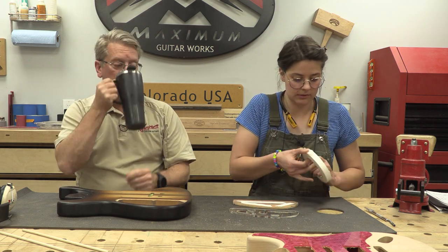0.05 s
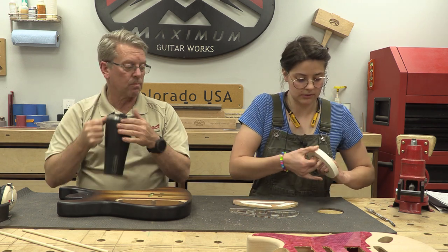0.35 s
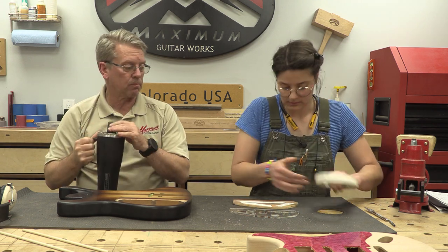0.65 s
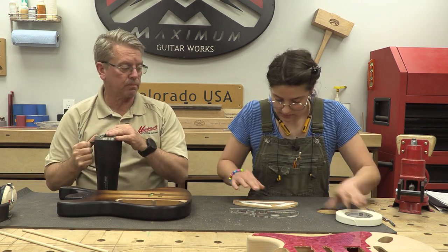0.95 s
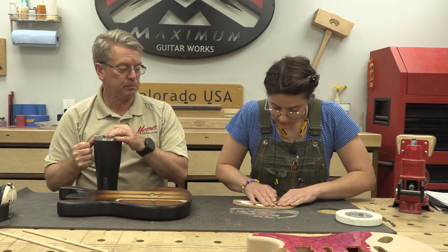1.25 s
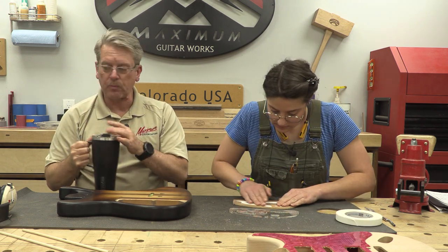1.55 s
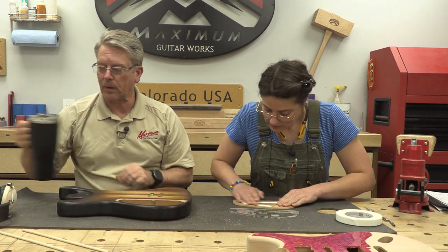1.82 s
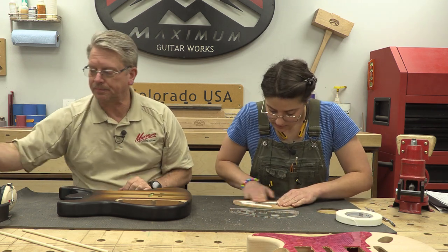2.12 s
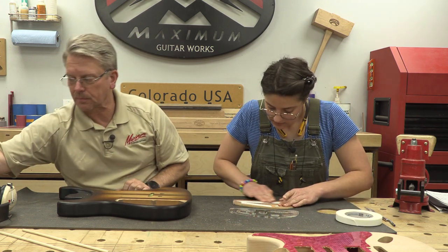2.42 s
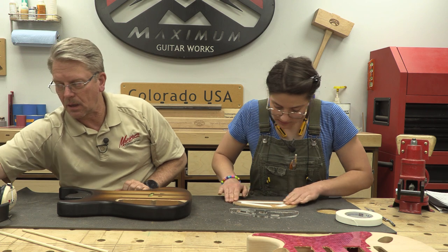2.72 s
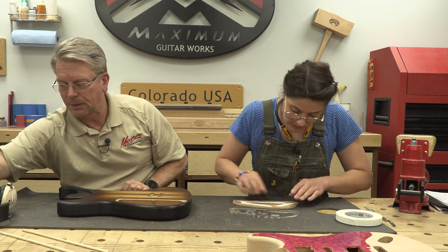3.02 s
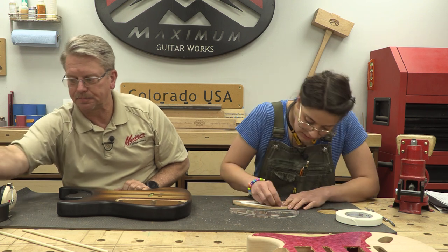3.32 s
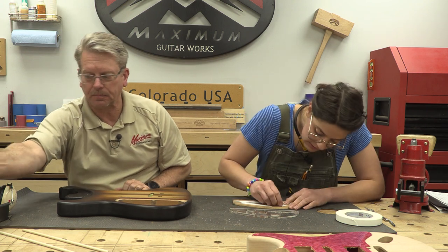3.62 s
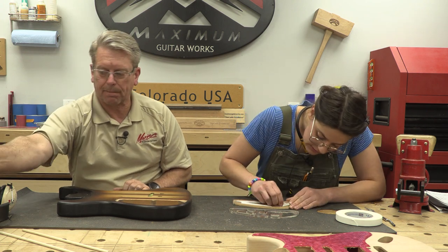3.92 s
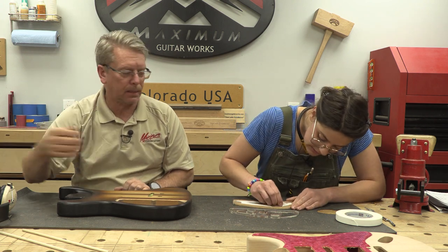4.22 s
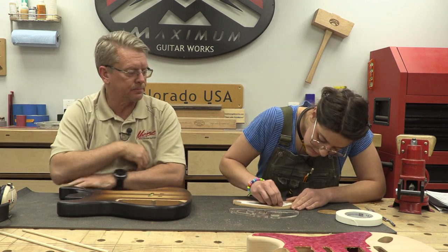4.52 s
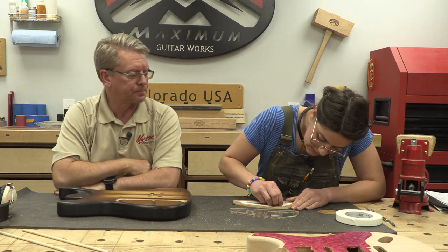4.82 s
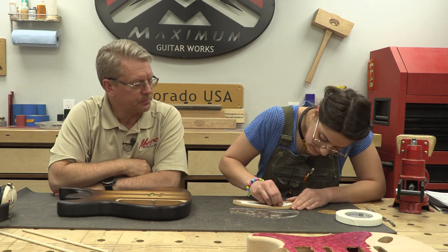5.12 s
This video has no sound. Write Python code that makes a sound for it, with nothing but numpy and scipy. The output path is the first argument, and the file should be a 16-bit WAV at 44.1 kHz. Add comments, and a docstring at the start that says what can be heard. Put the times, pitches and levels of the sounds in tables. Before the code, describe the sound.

Masking tape rustles lightly, then the roll drops on a wooden workbench with a bouncing thud. The tape gives a few sharp snaps, and fingers rub it along a thin template in several hissing, papery strokes. A mug is set down with a dull knock, followed by two small clacks, faint fingernail picking and a soft scuff. The sounds are fairly close, in a small, quiet workshop.

```python
"""Masking tape rustles, snaps and rasps at a wooden workbench in a small workshop.
The roll drops and bounces, ringing the bench top. Fingers rub the tape along a thin template in six
strokes, the last one light: tiny stick-slip releases hiss, rasp and set the template ringing.
A fingernail picks at the edge, a mug is set down with a dull knock, then come two small clacks and a
scuff, all in a short room decay over quiet air."""
import sys
import numpy as np
from scipy import signal
from scipy.fft import rfft, irfft, next_fast_len
from scipy.io import wavfile

SR = 44100
rng = np.random.default_rng(int(sys.argv[2]) if len(sys.argv) > 2 else 0)


def file_out(sig):
    """Save sig as 16-bit WAV at sys.argv[1]."""
    # one column per channel
    cols = np.atleast_2d(sig).T
    # limit, then scale
    lim = np.clip(cols, -1, 1)
    pcm = np.round(lim * 32767).astype(np.int16)
    wavfile.write(sys.argv[1], SR, pcm)


N = 227467
TIME = np.arange(N) / SR
SHORT = TIME[:SR * 7 // 10]   # time axis of one hit or room tail

# papery rasp of rubbed tape: (frequency [Hz], level [dB])
RASP_SPECTRUM = [(1500, -33), (2200, 1.5), (2800, 5.5), (3900, 5.5), (4700, 4.5), (5500, 0.5), (7000, -14)]
# airy sound of brushed paper: (frequency [Hz], level [dB])
BRUSH_SPECTRUM = [(400, -13.5), (1500, -13.5), (2400, -11.5), (3200, -10.5), (5000, -17.5), (6500, -10),
                  (8300, -2), (10000, 0), (12000, -3), (13000, -16), (15800, -28.5)]


def amp(db):
    """Decibels to gain."""
    return 10 ** (np.asarray(db) / 20)


def rms_one(x):
    """Scale to unit rms."""
    return x / np.sqrt(np.mean(x ** 2) + 1e-20)


def peak_one(x):
    """Scale to unit peak."""
    return x / np.abs(x).max()


def at_hz(points, hz):
    """Read a table on a log-frequency axis."""
    freqs, values = np.transpose(points)
    return np.interp(np.log(np.maximum(hz, 1)), np.log(freqs), values)


def colour(x, spectrum):
    """Give a noise a spectrum; rms 1."""
    size = next_fast_len(len(x))
    gains = amp(at_hz(spectrum, np.fft.rfftfreq(size, 1 / SR)))
    return rms_one(irfft(rfft(x, size) * gains, size)[:len(x)])


def hit_noise(spectrum):
    """Coloured noise for one hit; rms 1."""
    return colour(rng.standard_normal(len(SHORT)), spectrum)


def cut(x, hz, kind, order=2):
    """Butterworth filter."""
    sos = signal.butter(order, np.clip(hz, 10, .45 * SR), kind, fs=SR, output="sos")
    return signal.sosfilt(sos, x)


def flutter(rate_hz):
    """Smooth random modulation; rms 1."""
    return rms_one(cut(rng.standard_normal(N), rate_hz, "low"))


def dying(t60):
    """Envelope that loses 60 dB in t60 seconds."""
    return np.exp(-np.log(1000) * SHORT / max(t60, 1e-3))


def add(track, start_s, sound):
    """Mix a sound into the track."""
    start = max(int(start_s * SR), 0)
    track[start:start + len(sound)] += sound[:N - start]


def strike(modes, contact_hz, lowest_hz):
    """Modes rung by one contact, duller the softer it is; a small body radiates little bass. Peak 1."""
    ring = sum(amp(db) * dying(t60) * np.sin(2 * np.pi * hz * SHORT) for hz, db, t60 in modes)
    ring = cut(cut(ring, contact_hz, "low", order=1), 4 * contact_hz, "low")
    return peak_one(cut(ring, lowest_hz, "high"))


def slips(per_s, spread_db):
    """Tiny stick-slip releases of uneven size on the creped paper."""
    sizes = amp(spread_db * np.minimum(rng.exponential(1, N), 5)) * rng.choice([-1, 1], N)
    return rms_one(sizes * (rng.random(N) < per_s / SR))


def swell(start, rise, hold, fall, sag_db_per_s=0):
    """Pressure of one movement of the hand: a rounded rise, a hold that may sag, a rounded fall."""
    edge_db = 38.5   # depth of the rise and the fall
    top = start + rise
    early = np.maximum(top - TIME, 0) / max(rise, 1e-3)
    late = np.maximum(TIME - top - hold, 0) / max(fall, 1e-3)
    sag_db = sag_db_per_s * np.clip(TIME - top, 0, hold + fall)
    return amp(np.maximum(-edge_db * (early ** 2 + late ** 2) - sag_db, -300))


def moving_resonance(x, centre_hz, width_hz, block=128):
    """A resonance whose centre glides; rms 1."""
    radius = np.exp(-np.pi * width_hz / SR)
    out, state = np.zeros(N), np.zeros(2)
    for i in range(0, N, block):
        poles = [1, -2 * radius * np.cos(2 * np.pi * centre_hz[i] / SR), radius * radius]
        out[i:i + block], state = signal.lfilter([1, 0, -1], poles, x[i:i + block], zi=state)
    return rms_one(out)


def brushing():
    """Skin slides lightly on the roll and the tape, part airy, part papery."""
    # hand movements: (start [s], rise [s], hold [s], fall [s], airy level [dB], papery level [dB])
    slides = [(-.03, 0.035, 0.023, 0.12, -55, -63), (.05, 0.022, 0.026, 0.081, -47.5, -76),
              (0.127, 0.043, 0.13, 0.18, -81, -69), (0.3, .008, 0.0026, 0.027, -64, -86),
              (0.328, 0.082, 0.0055, 0.12, -55.5, -62), (0.475, 0.063, 0.014, 0.12, -71.5, -66.5),
              (0.617, 0.047, 0.015, 0.05, -68, -64), (0.707, 0.041, 0.069, .07, -75, -74),
              (0.858, .031, .002, 0.024, -61, -76), (1.118, 0.029, 0.022, 0.087, -52, -52),
              (1.203, .06, 0.054, 0.051, -72.5, -58), (2.63, .04, .025, .05, -59, -52),
              (3.198, 0.024, .012, 0.076, -68.5, -60.5), (4.482, 0.15, 0.038, 0.094, -75.5, -73)]
    airy = papery = 0
    for *timing, airy_db, papery_db in slides:
        pressure = swell(*timing)
        airy += amp(airy_db) * pressure
        papery += amp(papery_db) * pressure
    rustle = airy * colour(slips(12000, 1.5), BRUSH_SPECTRUM)
    rustle += amp(-3.5) * papery * colour(slips(6100, 1.1), RASP_SPECTRUM)
    return rustle * amp(0.75 * flutter(rate_hz=140) - 1.0)


def tape_snaps():
    """Tape and template let go with a gritty crack; the pitch depends on where the fingers hold them."""
    # releases: (time [s], level [dB], contact cut-off [Hz], pitch [ratio])
    releases = [(0.051, -28.5, 9300, 1.19), (0.279, -47.5, 3460, 0.93), (1.1291, -35.5, 2350, 0.64),
                (1.1575, -34, 2404, 0.78), (1.1984, -17.5, 6840, 0.98), (1.3546, -12, 4060, 1.013),
                (1.3575, -14, 3200, 0.97), (1.934, -24, 9200, 1.02), (2.6772, -21, 2900, 0.924),
                (2.861, -39.5, 5000, 1.28), (3.232, -48, 1400, 0.8), (3.2467, -39.5, 1800, 0.92),
                (4.833, -47, 3070, 0.99)]
    # modes of the taped template: (frequency [Hz], level [dB], t60 [s])
    template_modes = [(474, -11.5, 0.086), (850, -16, 0.032), (1234, -11, 0.015), (1824, 3.5, 0.013),
                      (2136, 1.5, 0.013), (2660, -2, 0.018), (3540, 5.5, 0.0069), (4355, -2, 0.016),
                      (5320, -2, 0.0073), (7700, 6, 0.0032), (10160, 7, 0.0025)]
    # grit of the crack: (frequency [Hz], level [dB])
    grit_spectrum = [(200, 7), (1000, -5), (2000, -13.5), (3600, 7), (4700, -1.5), (7000, -5.5),
                     (12000, -27), (15000, -38)]
    attack = 1 - np.exp(-SHORT / 0.0016)   # the glue gives way
    out = np.zeros(N)
    for time, db, contact_hz, ratio in releases:
        lowest_hz = 754 * ratio ** 6.1   # higher snaps are much thinner
        modes = [(hz * ratio, mode_db, t60) for hz, mode_db, t60 in template_modes]
        grit = amp(-1) * cut(hit_noise(grit_spectrum), contact_hz, "low") * dying(0.0092)
        crack = strike(modes, contact_hz, lowest_hz) + cut(grit, lowest_hz, "high")
        add(out, time, amp(db) * peak_one(crack * attack))
    return out


def nail_ticks():
    """A fingernail flicks the paper edge: tiny, very bright bursts."""
    # flicks: (time [s], level [dB])
    flicks = [(0.053, -27), (0.298, -41), (0.8888, -43), (4.338, -63), (4.376, -61)]
    envelope = dying(0.0083) * (1 - np.exp(-SHORT / 0.00032))
    out = np.zeros(N)
    for time, db in flicks:
        burst = cut(hit_noise(BRUSH_SPECTRUM), 900, "high") * envelope
        add(out, time, amp(db) * peak_one(burst))
    return out


def mug_tink():
    """A light touch rings two modes of the mug, one long and one short."""
    long_mode, short_mode = (550, -7, 1), (1285, 0.5, 0.11)   # (frequency [Hz], level [dB], t60 [s])
    ring = strike([long_mode, short_mode], contact_hz=3000, lowest_hz=200)
    out = np.zeros(N)
    add(out, start_s=0.28, sound=amp(-53.5) * ring)
    return out


def hand_bumps():
    """Flesh on wood: a low ring with a soft start."""
    # soft contacts: (time [s], level [dB], pitch [Hz])
    contacts = [(0.297, -50.5, 151), (0.729, -54, 200), (1.13, -29.5, 128), (1.156, -26.5, 156),
                (2.1235, -35.5, 168), (2.418, -48, 246.9), (3.202, -39, 136.5), (3.227, -40.5, 169),
                (3.247, -46, 252), (3.911, -33.5, 261), (4.834, -30, 291)]
    out = np.zeros(N)
    for time, db, hz in contacts:
        attack = 1 - np.exp(-(SHORT * hz * 0.87) ** 2)
        thud = np.sin(2 * np.pi * hz * SHORT) * dying(0.02) * attack
        add(out, time, amp(db) * peak_one(thud))
    return out


def wood_knocks(contacts, modes, rattle_t60, lowest_hz, rise_s):
    """Each contact rings the main modes of the wood and a dense, short-lived rattle of others."""
    # dense modes of the wood: (frequency [Hz], level [dB])
    rattle_spectrum = [(60, -40), (110, 13.5), (200, 3), (450, 4), (750, -4.5), (1000, -10.5),
                       (1600, -16.5), (2500, -18), (3300, -28.5), (4500, -41.5), (7000, -50.5),
                       (14000, -61)]
    envelope = dying(rattle_t60) * (1 - np.exp(-(SHORT / rise_s) ** 2))
    out = np.zeros(N)
    for time, db, contact_hz, rattle_db in contacts:
        rattle = hit_noise(rattle_spectrum) * envelope
        add(out, time, amp(db) * strike(modes, contact_hz, lowest_hz) + amp(rattle_db) * rattle)
    return out


def roll_drop():
    """The roll lands on the bench top and bounces."""
    # landings: (time [s], ring level [dB], contact cut-off [Hz], rattle level [dB])
    landings = [(0.9155, -13, 1300, -30), (0.9235, -26, 1495, -41), (0.9955, -10.5, 700, -37)]
    # modes of the bench top: (frequency [Hz], level [dB], t60 [s])
    bench_modes = [(133, 2, .17), (172.3, 1.5, 0.1), (205, -2, 0.049), (268, -11, 0.12), (322, -9, 0.046),
                   (385, -8.5, 0.12), (457, -20, 0.17), (760, -6, 0.0093), (916, -16.5, 0.012),
                   (1350, -10, 0.0059), (1697, 0.5, 0.005), (2820, -19, 0.019)]
    return -wood_knocks(landings, bench_modes, rattle_t60=0.29, lowest_hz=118, rise_s=0.00034)


def stroke_controls():
    """Gains of hiss, rasp, ring and undertone, then three pitches; the ring glides with the finger."""
    # finger strokes: (start [s], rise [s], hold [s], fall [s], hiss [dB], rasp [dB], ring [dB],
    # undertone [dB], rasp lag [s], rasp pitch [Hz], ring from [Hz], ring to [Hz], undertone pitch [Hz])
    strokes = [(1.344, 0.092, 0.061, 0.052, -45, -38.5, -41.5, -52, -0.027, 3500, 1690, 1240, 586),
               (1.547, 0.092, 0.0097, 0.14, -47, -47, -43.5, -48.5, 0.01, 3480, 1460, 1380, 445),
               (1.739, 0.13, 0.0099, 0.19, -40, -35, -37.5, -64, 0.0028, 3130, 1550, 1556, 620),
               (2.097, .063, .14, 0.067, -41, -42, -38.5, -55.5, 0.00013, 4430, 1810, 1159, 760),
               (2.362, 0.16, 0.047, 0.2, -43, -52, -35.5, -51, -0.019, 2960, 1480, 1630, 707),
               (2.614, 0.064, .16, 0.16, -52, -61, -56, -58, 0.028, 3600, 1630, 1370, 560)]
    sag_db_per_s = 26.5   # the finger eases off after the peak
    hiss = rasp = ring = under = weight = rasp_hz = ring_hz = under_hz = 0
    for (start, rise, hold, fall, hiss_db, rasp_db, ring_db, under_db,
         lag, upper_hz, from_hz, to_hz, lower_hz) in strokes:
        pressure = swell(start, rise, hold, fall, sag_db_per_s)
        grip = swell(start + lag, rise, hold, fall, sag_db_per_s)
        onset = np.clip((TIME - start) / .012, 0, 1)
        pitch = np.interp(TIME, [start, start + rise + hold + fall], [from_hz, to_hz])
        octaves = np.log2(pitch / np.sqrt(from_hz * to_hz))
        hiss += amp(hiss_db) * pressure ** 1.02
        ring += amp(ring_db) * pressure
        # where the template rings higher, the tape rasps more and sounds less hollow
        rasp += amp(rasp_db + 15.5 * octaves) * grip ** 0.82 * onset
        under += amp(under_db - 12 * octaves) * pressure ** 0.66
        rasp_hz += pressure * upper_hz
        ring_hz += pressure * pitch
        under_hz += pressure * lower_hz
        weight += pressure
    wander = 1 + 0.045 * flutter(rate_hz=23)
    return hiss, rasp, ring, under, rasp_hz / weight, ring_hz / weight * wander, under_hz / weight


def rubbing():
    """Slips under the fingers hiss, rasp and excite template resonances that move with the hand."""
    # hiss of fingers on tape: (frequency [Hz], level [dB])
    hiss_spectrum = [(3500, -10.5), (5500, -2), (6700, 0), (7700, -4.5), (9500, -3), (12000, -2),
                     (12700, -15.5), (15800, -23)]
    hiss, rasp, ring, under, rasp_hz, ring_hz, under_hz = stroke_controls()
    ringing = moving_resonance(slips(5000, 0.79), ring_hz, width_hz=730)
    ringing = moving_resonance(ringing, ring_hz, width_hz=540)
    undertone = moving_resonance(slips(4000, 0.86), under_hz, width_hz=170)
    undertone = moving_resonance(undertone, under_hz, width_hz=480)
    rasping = colour(slips(6200, 1.0), RASP_SPECTRUM)
    rasping = rms_one(rasping + amp(-3.5) * moving_resonance(rasping, rasp_hz, width_hz=1700))
    sound = ring * rms_one(cut(ringing, 1060, "high", order=6)) + under * undertone
    sound += amp(1.0) * hiss * colour(slips(16000, 0.62), hiss_spectrum)
    sound += amp(-1.6) * rasp * rasping * amp(0.83 * flutter(rate_hz=21.7))
    return sound * amp(0.64 * flutter(rate_hz=290) - 1.03)   # the grip judders


def template_slaps():
    """The template is pressed flat and slaps the mat."""
    # slaps: (time [s], level [dB])
    contacts = [(1.357, -26), (2.678, -25)]
    # modes of the slap: (frequency [Hz], level [dB], t60 [s])
    slap_modes = [(98, -12, 0.032), (303, -7.5, 0.081), (400, -6.5, 0.047), (481.6, 1, 0.069),
                  (634, -14, 0.018)]
    out = np.zeros(N)
    for time, db in contacts:
        add(out, time, amp(db) * strike(slap_modes, contact_hz=900, lowest_hz=50))
    return out


def nail_picking():
    """A fingernail picks at the edge of the tape with a faint, grainy scrape."""
    # scrapes: (start [s], rise [s], hold [s], fall [s], level [dB])
    scrapes = [(3.247, 0.11, 0.16, 0.19, -64), (3.508, 0.065, 0.011, 0.2, -54),
               (3.699, 0.046, 0.065, 0.18, -57), (3.848, 0.083, 0.18, 0.11, -67.5),
               (4.097, 0.11, 0.15, 0.09, -70.5), (4.88, 0.055, 0.083, .12, -76)]
    # nail on tape: (frequency [Hz], level [dB])
    nail_spectrum = [(500, -3), (850, -26.5), (1130, 4), (1450, -8.5), (2200, -10), (3000, -9),
                     (5500, -15.5), (8000, -27), (12000, -33), (15000, -47)]
    pressure = sum(amp(db) * swell(*timing) for *timing, db in scrapes)
    pressure *= amp(4.7 * flutter(rate_hz=12.3) + 0.04)
    return pressure * colour(slips(per_s=1500, spread_db=2.0), nail_spectrum)


def mug_knock():
    """The mug lands on wood and rocks to rest."""
    # landings: (time [s], ring level [dB], contact cut-off [Hz], rattle level [dB])
    landings = [(3.4870, -22.5, 160, -32), (3.4930, -18.5, 900, -20), (3.4990, -12, 590, -25.5),
                (3.5245, -18, 453, -27), (3.5390, -21.5, 1500, -23.5), (3.591, -33, 900, -34.5)]
    # modes of the surface under the mug: (frequency [Hz], level [dB], t60 [s])
    surface_modes = [(128.6, -3, 0.24), (173.3, -5.5, 0.35), (261, 8, 0.13), (272, 2.5, 0.086),
                     (297, -1, 0.26), (387, -16, 0.14), (410, -57, 0.17), (463, -1, 0.06), (536, 1, 0.066),
                     (670, -5, .2), (724, -5, 0.2), (860, -24, 0.12), (1120, -28, .15), (1430, -31, .2),
                     (1670, -6.5, .2), (2510, 2, .1), (2660, -2, .08)]
    return wood_knocks(landings, surface_modes, rattle_t60=0.15, lowest_hz=55.7, rise_s=0.0025)


def bench_shudder(start_s, db, t60):
    """The whole bench shudders unevenly after a knock or a push."""
    # rumble of the bench: (frequency [Hz], level [dB])
    rumble_spectrum = [(20, -4), (45, 15), (75, -17.5), (130, 6.5), (220, -12), (400, -39.5)]
    envelope = dying(t60) * (1 - np.exp(-SHORT / 0.0056))
    out = np.zeros(N)
    add(out, start_s, amp(db) * hit_noise(rumble_spectrum) * envelope)
    return cut(out, 600, "low")


def small_clacks():
    """Two clacks from hard, quickly damped contacts; the first is a tight double hit."""
    # contacts: (time [s], level [dB], contact cut-off [Hz])
    contacts = [(3.7407, -11.5, 4460), (3.7448, -22, 2000), (3.819, -20.5, 1210)]
    # modes of the clacking piece: (frequency [Hz], level [dB], t60 [s])
    piece_modes = [(663, -6, 0.037), (1065, -9.5, .014), (1333, 8.5, 0.0084), (1590, -3, 0.011),
                   (2660, -5.5, 0.011), (4400, -19, 0.0024)]
    out = np.zeros(N)
    for time, db, contact_hz in contacts:
        add(out, time, amp(db) * strike(piece_modes, contact_hz, lowest_hz=448))
    return cut(out, 480, "high", order=4)


def hand_scuff():
    """The hand sticks and slips in one short, low scuff."""
    # hand movement: (start [s], rise [s], hold [s], fall [s], level [dB])
    pushes = [(4.824, 0.041, 0.016, 0.052, -49.5)]
    # body of the scuff: (frequency [Hz], level [dB])
    scuff_spectrum = [(59, -49), (100, -27), (202, 1.5), (301, -5.5), (458, -1), (583, -24), (727, -17),
                      (836, -33), (981, -11), (1270, -32), (1650, -13.5), (2730, -42), (3140, -17.5),
                      (4150, -16), (12000, -47.5), (15600, -76), (22000, -120)]
    pressure = sum(amp(db) * swell(*timing) for *timing, db in pushes)
    return pressure * colour(slips(per_s=6000, spread_db=2.4), scuff_spectrum)


def nearby(x):
    """Close surfaces add early copies that ripple the spectrum."""
    # reflections off the bench top and the body: (delay [s], level [dB])
    echoes = [(.00075, -26), (.0027, -34.5), (.0049, -19), (.0083, -28.5)]
    return x + sum(amp(db) * np.interp(TIME - delay, TIME, x, left=0) for delay, db in echoes)


def room(x, build_up_s=0.00067):
    """Diffuse reflections that build up, then die away, sooner in the treble."""
    # decay of the workshop: (frequency [Hz], t60 [s])
    decay_times = [(100, 0.38), (500, 0.33), (1300, 0.36), (3500, 0.18), (7000, 0.27), (14000, 0.1)]
    edges_hz = np.geomspace(45, 16000, 10)
    tail = 0
    for low, high in zip(edges_hz, edges_hz[1:]):
        band = cut(rng.standard_normal(len(SHORT)), [low, high], "band")
        tail += band * dying(at_hz(decay_times, np.sqrt(low * high)))
    tail *= 1 - np.exp(-SHORT / build_up_s)
    return signal.fftconvolve(x, tail / np.sqrt(np.sum(tail ** 2)))[:N]


def workshop_air():
    """Quiet, steady room tone, strongest in the bass."""
    # room tone: (frequency [Hz], level [dB])
    air_spectrum = [(15, -33), (25, -11.5), (97, 1.5), (185, -3.5), (328, -2), (374, -6), (538, -6.5),
                    (774, -11.5), (1140, -12), (1410, -15.5), (1970, -13.5), (2190, -16), (4420, -21),
                    (7050, -25), (12500, -30.5), (16200, -73), (22000, -120)]
    return amp(-66) * colour(rng.standard_normal(N), air_spectrum)


def scene():
    """All sources and their reflections over the workshop's air, in mono."""
    tape = nearby(brushing() + nail_ticks() + rubbing() + nail_picking() + hand_scuff())
    snaps = tape_snaps()
    bumps = cut(mug_tink() + hand_bumps() + template_slaps(), 35, "high")
    bumps += bench_shudder(start_s=5.003, db=-47.5, t60=0.2)
    knocks = roll_drop() + mug_knock() + bench_shudder(start_s=3.49, db=-30.5, t60=0.66)
    clacks = small_clacks()
    reverb = room(amp(-16.5) * knocks + amp(-14) * tape + amp(-10) * bumps)
    reverb += amp(-6) * room(cut(snaps, 5200, "low", order=1), build_up_s=0.0024)
    reverb += amp(-24.5) * room(clacks, build_up_s=0.24)   # back late, from the far walls
    return (tape + snaps + bumps + knocks + clacks + reverb + workshop_air())[None]


def record(dry):
    """A steep low-pass takes off the very top."""
    cutoff_hz = 15500
    return signal.sosfilt(signal.ellip(10, .1, 80, cutoff_hz, fs=SR, output="sos"), dry)


dry = scene()
out = record(dry)
file_out(out)
```